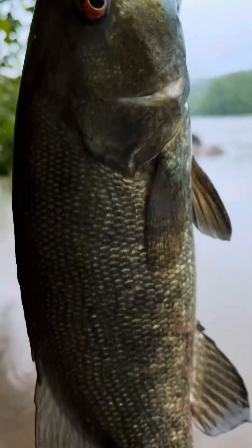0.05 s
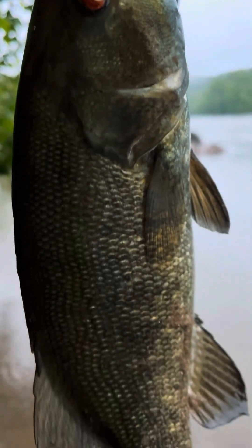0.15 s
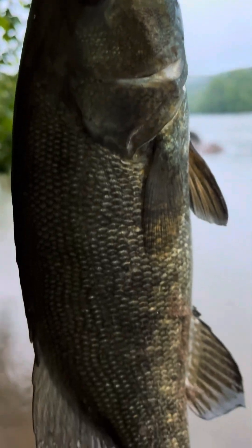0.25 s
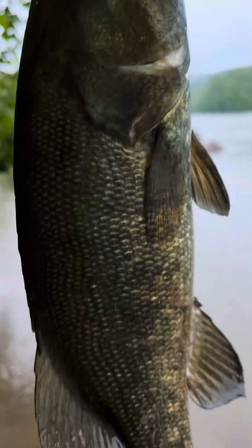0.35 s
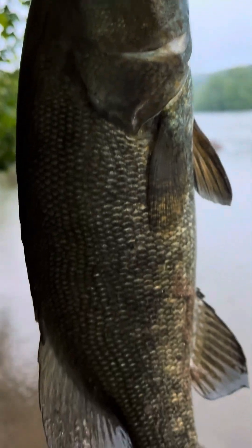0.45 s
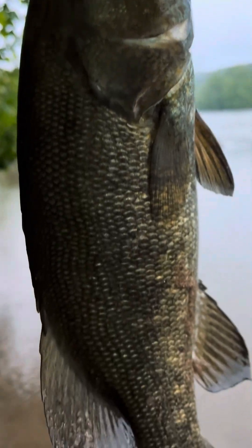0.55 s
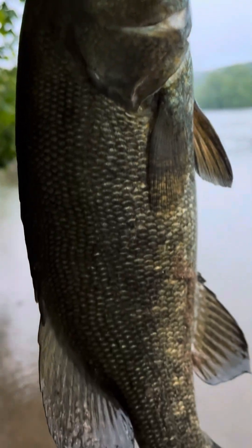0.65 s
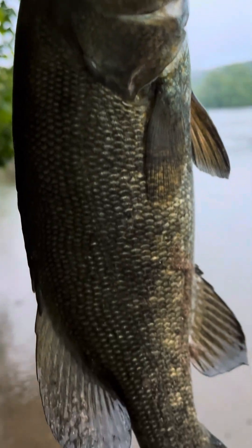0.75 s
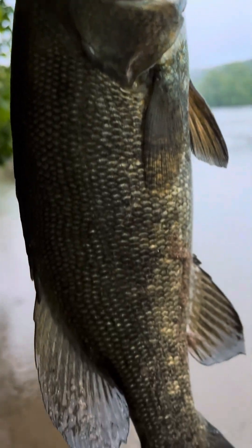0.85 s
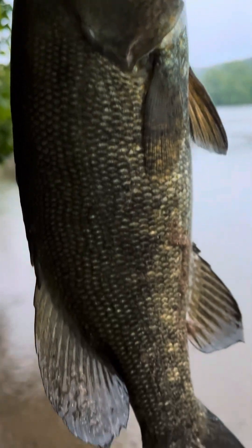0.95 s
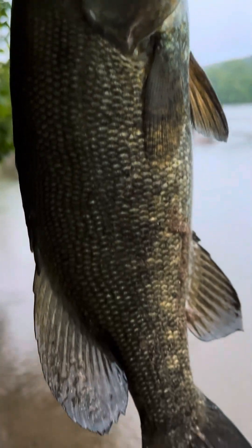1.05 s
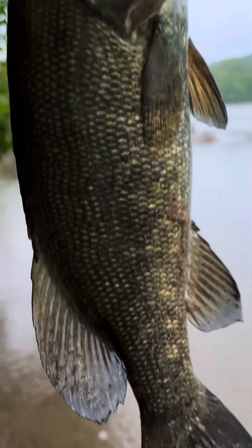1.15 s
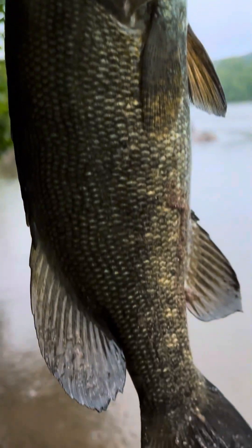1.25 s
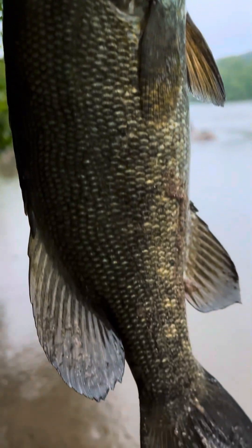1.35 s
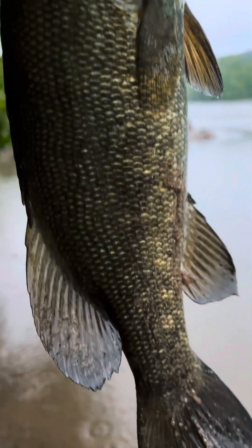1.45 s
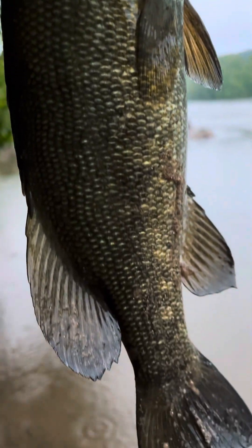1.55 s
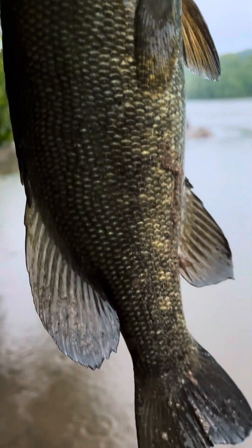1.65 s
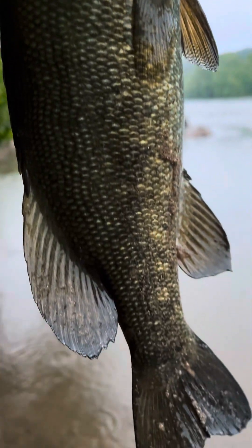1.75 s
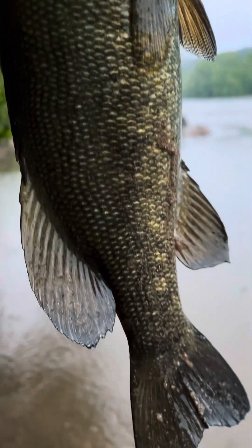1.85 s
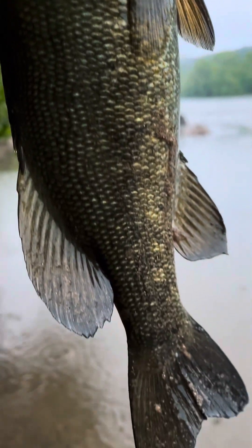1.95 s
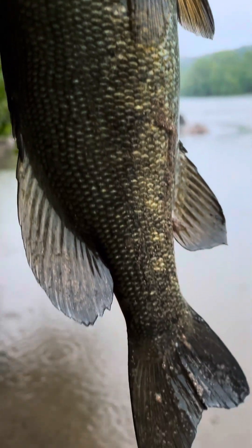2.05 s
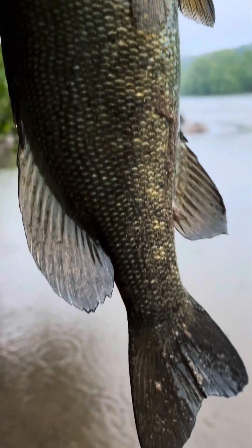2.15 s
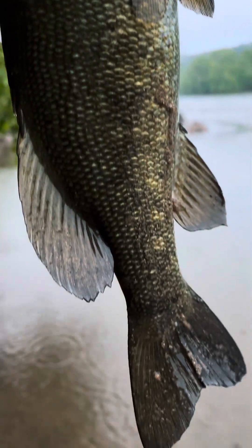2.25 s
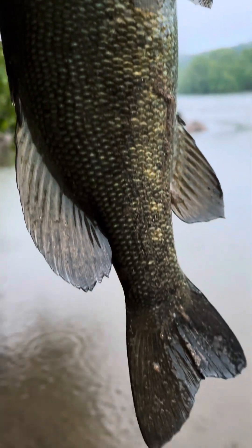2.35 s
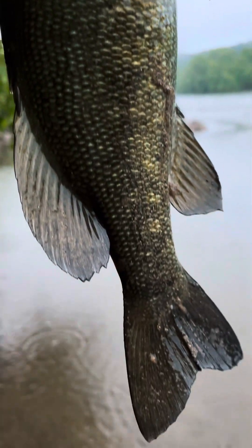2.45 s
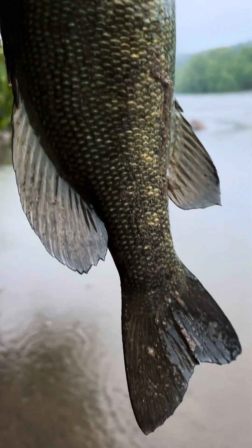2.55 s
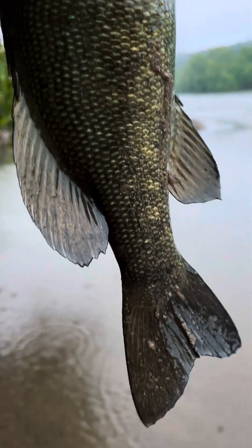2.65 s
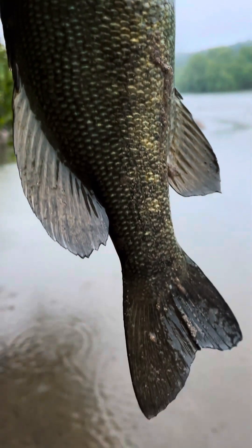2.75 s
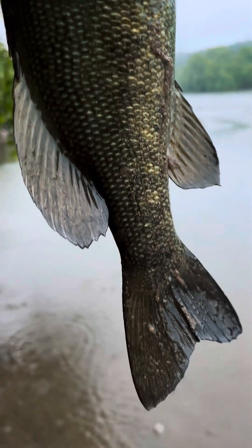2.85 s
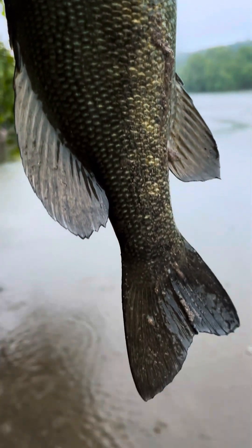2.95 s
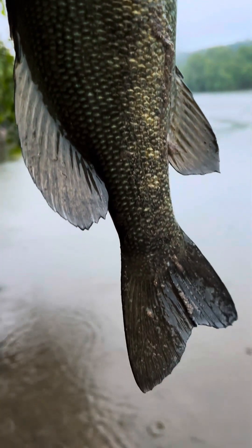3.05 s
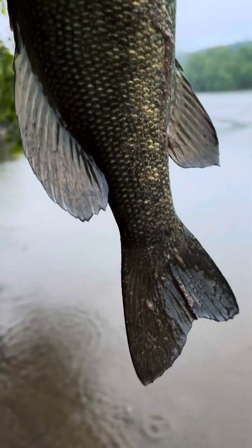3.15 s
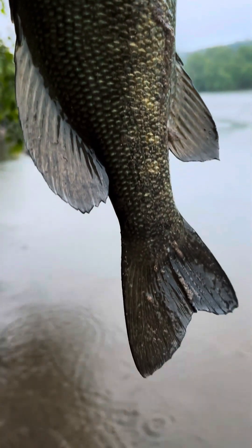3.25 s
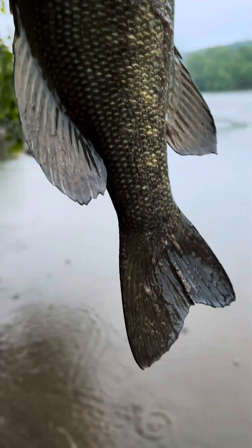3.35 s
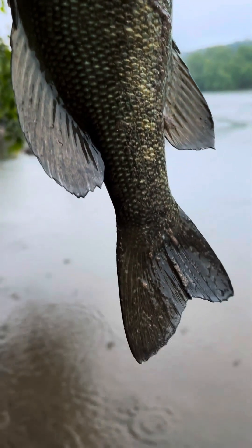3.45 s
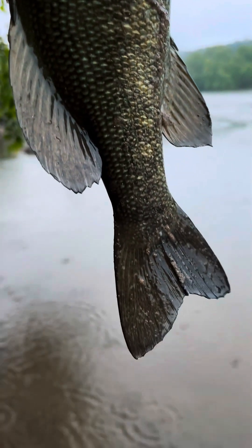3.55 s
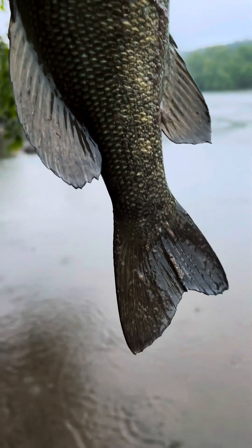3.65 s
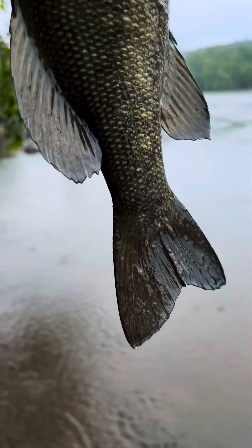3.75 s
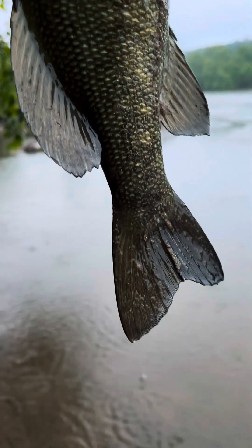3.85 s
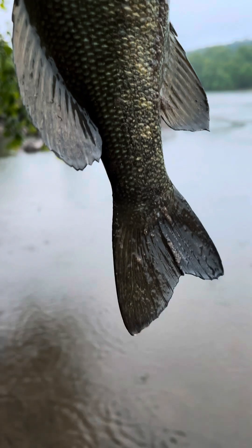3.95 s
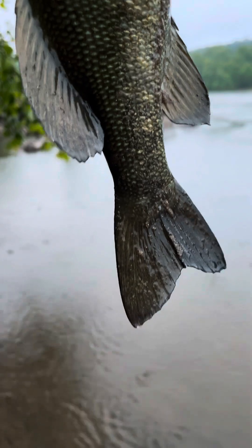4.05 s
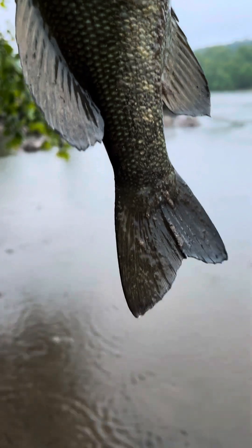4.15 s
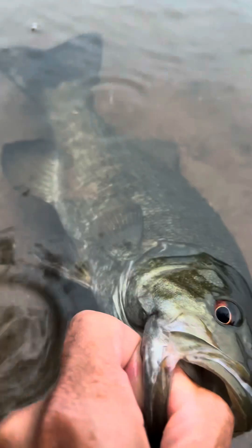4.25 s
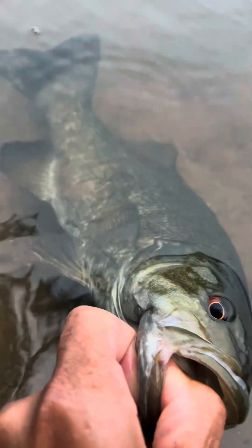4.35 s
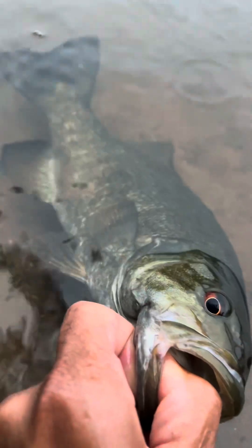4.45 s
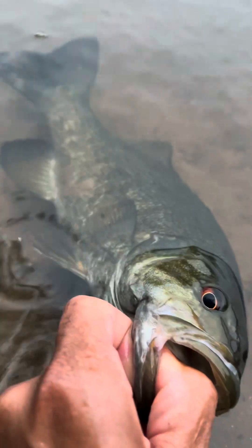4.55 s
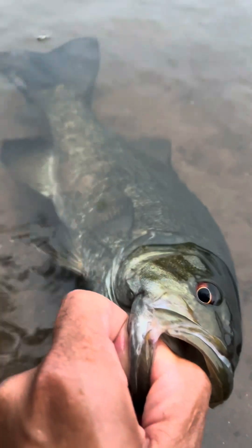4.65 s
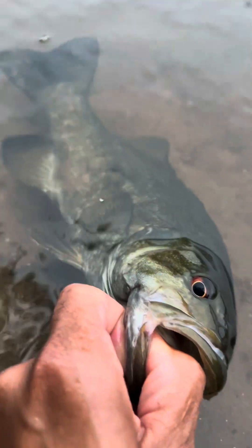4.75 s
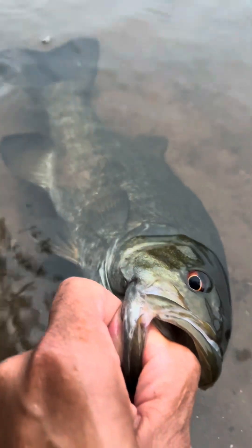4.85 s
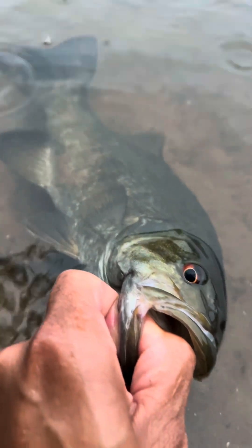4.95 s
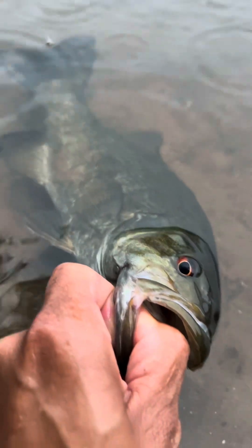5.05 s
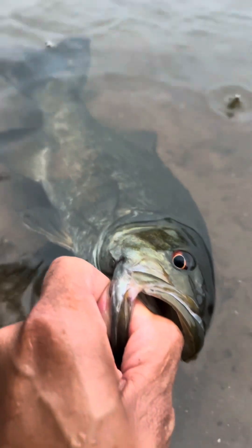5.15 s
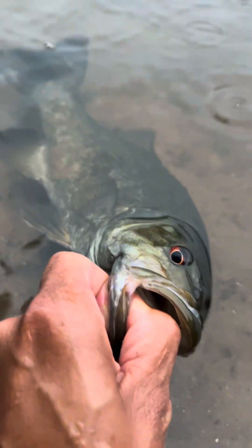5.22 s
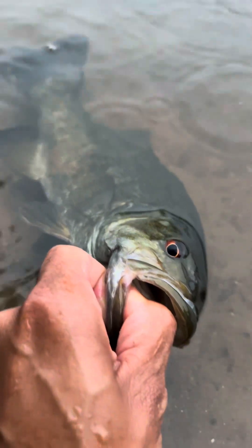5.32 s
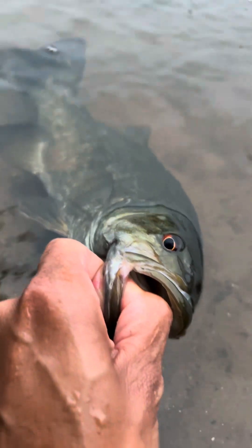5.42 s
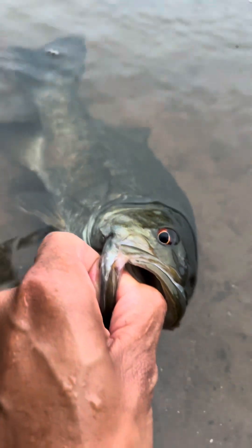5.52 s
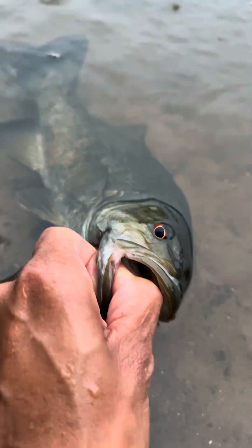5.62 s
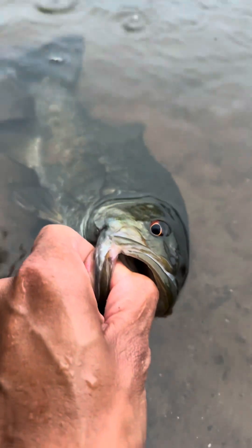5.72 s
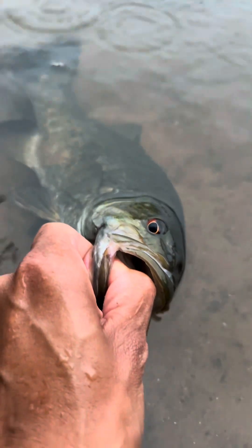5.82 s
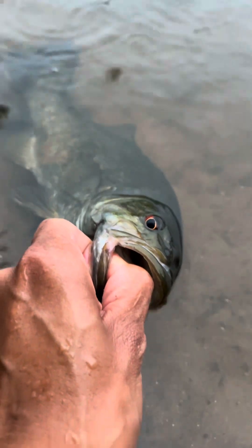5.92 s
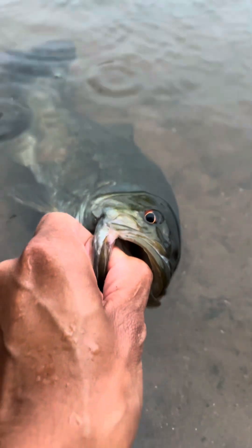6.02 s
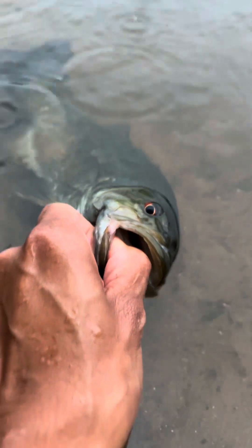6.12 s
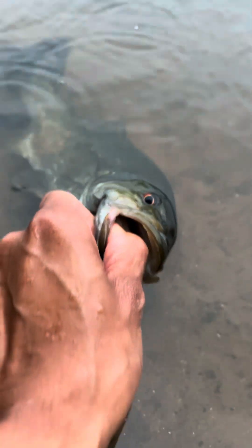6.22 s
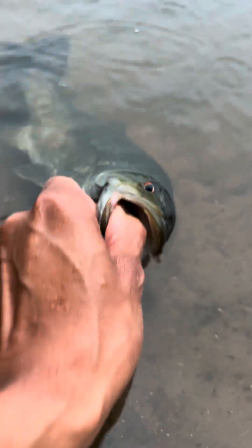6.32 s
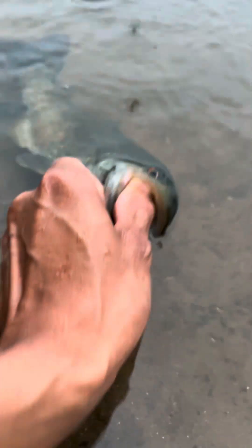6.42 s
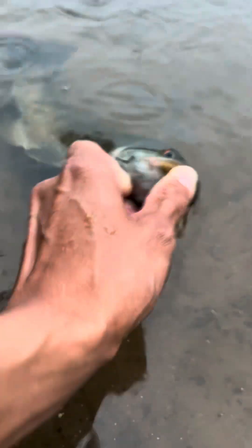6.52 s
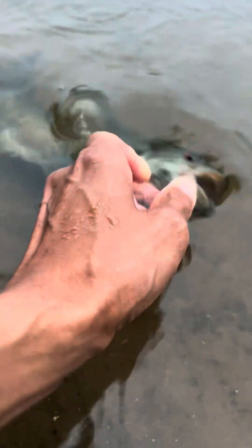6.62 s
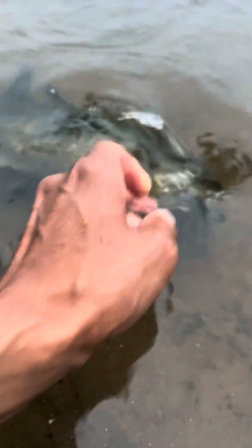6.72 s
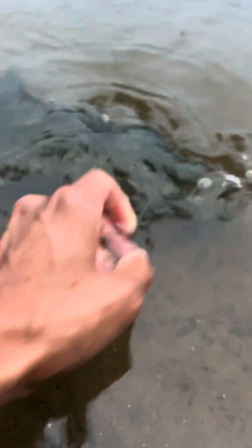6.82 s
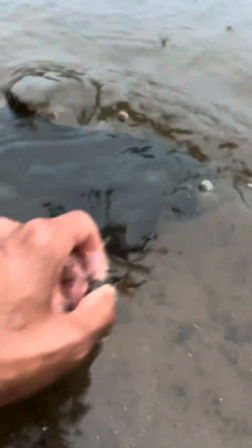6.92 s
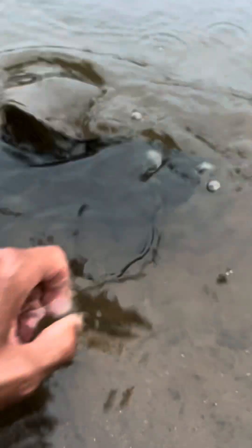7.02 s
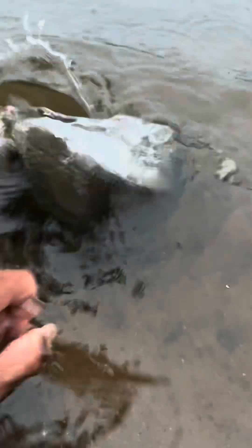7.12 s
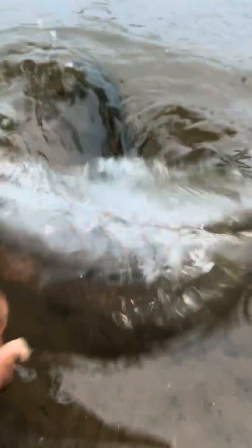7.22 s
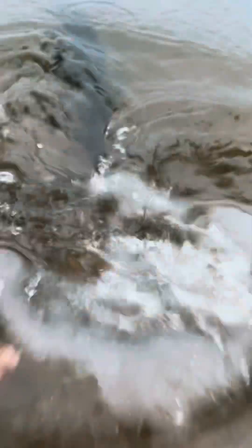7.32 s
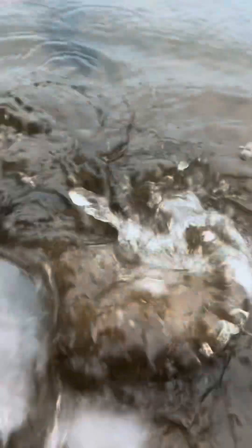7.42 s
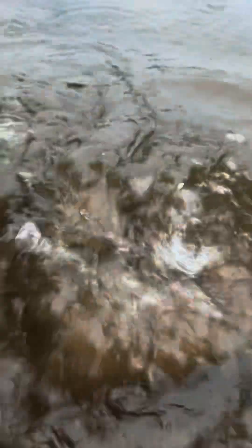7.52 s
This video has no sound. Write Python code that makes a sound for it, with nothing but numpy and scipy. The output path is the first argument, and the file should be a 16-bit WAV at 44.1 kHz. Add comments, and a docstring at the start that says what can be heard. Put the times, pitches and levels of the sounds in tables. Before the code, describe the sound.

Steady rain falls on a river outdoors, heard close up through a phone in stereo. From 0 to 4.2 seconds it is a full, broad hiss with fine patter and crackle over a dull, swaying rumble, growing very slightly. Crisp near ticks and drips stand out, notably around 0.4, 0.7, 1.4, 2.3, 2.7 and 3.75 seconds, some with a tiny ringing bubble. From about 3.25 seconds a distant bird gives faint, slurred, burry whistles with a soft echo. At 4.2 seconds the sound cuts abruptly to much quieter rain with little rumble and only sparse, small drips, one bubbly at 5.0. At 6.67 a soft hollow plop fades and bends upward. At 7.02 a sharp wet slap cracks, followed by surging spray, deep gulping bubbles around 7.15 to 7.25, and gurgling froth, with another burst near 7.4 before it subsides at the end.

```python
"""Steady rain on a river, heard by a phone: a hiss of far drops, near ticks and drips, a low rumble, then a far bird.
The level drops abruptly to a quieter stretch, where a fish slips free: a plop, a tail slap, a gurgling splash.
Rain and spray are shaped noise plus swarms of damped sines; ticks are band-passed pushes and puffs.
Bubbles, plop and whistles are gliding sines; the sides differ in phase, stepped in the treble."""
import sys
import numpy as np
from scipy import signal
from scipy.fft import rfft, irfft, next_fast_len
from scipy.io import wavfile
from scipy.ndimage import uniform_filter1d, map_coordinates

SR = 44100
rng = np.random.default_rng(int(sys.argv[2]) if len(sys.argv) > 2 else 0)


def store_wav(level_fs):
    """Save 16-bit WAV to argv[1]."""
    pcm = np.round(np.clip(np.atleast_2d(level_fs), -1, 1) * 32767)
    wavfile.write(sys.argv[1], SR, pcm.T.astype(np.int16))


N = 334278
TIME = np.arange(N) / SR
SIDES = np.array([[1], [-1]]) / 2  # left, right halves of a difference
QUIET_FROM_S = 4.189


def amp(db):
    """Decibels to linear gain."""
    return 10 ** (np.asarray(db) / 20)


def unit(x):
    """Scale to rms 1."""
    return x / np.sqrt(np.mean(x ** 2) + 1e-20)


def along(points, hz):
    """Interpolate (frequency [Hz], value) points on a log-frequency axis."""
    f, v = np.transpose(points)
    return np.interp(np.log(hz + 1), np.log(f + 1), v)


def wobble(knots_per_s):
    """Smooth random curve through normal knots."""
    knots = rng.standard_normal(int(N * knots_per_s / SR) + 4)
    return map_coordinates(knots, [TIME * knots_per_s])


def filtered(x, response):
    """Multiply the spectrum of x by a complex response of frequency."""
    m = next_fast_len(x.shape[-1] + 8192)
    spectrum = rfft(x, m) * response(np.fft.rfftfreq(m, 1 / SR))
    return irfft(spectrum, m)[..., :x.shape[-1]]


def rush(spectrum, alike, patchy_db):
    """Stereo noise of rms 1, patchy in time and frequency, with a left-right likeness set by frequency."""
    z = signal.stft(rng.standard_normal((2, N)), nperseg=256)[2]
    field = uniform_filter1d(rng.standard_normal(z.shape[1:]), 12, 0)
    field = uniform_filter1d(field, 5, 1)
    pair = signal.istft(z * amp(patchy_db * unit(field)), nperseg=256)[1][:, :N]

    def mid_side(hz):
        turn = np.arccos(np.clip(along(alike, hz), -1, 1)) / 2
        return amp(along(spectrum, hz)) * [np.cos(turn), np.sin(turn)]

    mid, side = filtered(pair, mid_side)
    return unit(np.array([mid + side, mid - side]))


SCATTER_S = .00004  # largest arrival difference between sides


def grains(count, centre_hz, octaves, cycles, spread_db, rise, span=(0, N / SR)):
    """Damped, gliding sines at random moments and sides, rms 1 over the span; a few are larger."""
    u, g = rng.random((count, 4)), rng.standard_normal((count, 1))
    hz = np.clip(centre_hz * 2 ** (octaves * g), 300, 14500)
    t = np.arange(min(int(6 * cycles * SR / centre_hz), 1400)) / SR
    turns = hz * t
    fade = (1 - np.exp(-2 * turns)) * np.exp(-turns / cycles) * np.cos(np.pi / 2 * t / t[-1])
    size = amp(-spread_db * np.log(u[:, 1:2] + 0.025))
    wave = size * fade * np.sin(2 * np.pi * turns * (1 + rise * turns / cycles))
    start = np.interp(u[:, :1], [0, 1], span) * SR
    lag = (2 * u[:, 3:] - 1) * SCATTER_S * SR
    at = [(np.abs(start + 8 + k * lag).astype(int) + np.arange(len(t))).ravel() for k in SIDES]
    gains = amp(3 * (u[:, 2:3] - .5)), amp(3 * (.5 - u[:, 2:3]))
    pair = np.array([np.bincount(a, (wave * s).ravel(), N + len(t))[:N] for a, s in zip(at, gains)])
    return unit(pair) * np.sqrt((span[1] - span[0]) * SR / N)


# rumble spectrum: (frequency [Hz], relative density [dB])
RUMBLE_SPECTRUM = [(13, -15), (22, -53), (50, -2.5), (97, 0.5), (175, -7.5), (258, -15), (400, -24.5),
                   (520, -29), (880, -120)]
# far-rain spectrum, loud stretch: (frequency [Hz], relative density [dB])
LOUD_HISS_SPECTRUM = [(120, -41), (300, -1), (600, -0.5), (1200, -1), (2300, -5.5), (3000, -5.5),
                      (4800, -8), (5700, -10), (6900, -15), (9000, -18), (12500, -19), (15700, -20.5),
                      (15950, -53)]
# far-rain spectrum, quiet stretch: (frequency [Hz], relative density [dB])
QUIET_HISS_SPECTRUM = [(120, -20), (300, 1), (600, -0.5), (1200, -2), (2300, -5.5), (3000, -7),
                       (4800, -8.5), (5900, -12), (6900, -17.5), (9500, -22), (12500, -17.5),
                       (15700, -20.5), (15950, -58)]
# far-rain stereo likeness: (frequency [Hz], left-right correlation [-1..1])
HISS_LIKENESS = [(60, .997), (200, .97), (400, .68), (800, .35), (1500, -.1), (2000, -.2), (2600, .4),
                 (3200, -.1), (3800, .15), (4400, 0), (5100, .5), (6200, .82), (8000, .97), (16000, .98)]
# rain balance, positive leans left: (frequency [Hz], left-right difference [dB])
RAIN_LEAN = [(100, -3), (300, 2), (700, 3), (1500, 2), (3000, 0.6), (5000, -1), (9000, 0)]
# base levels: (rumble [dB], rain [dB])
LOUD_DB, QUIET_DB = (-39, -42.5), (-56, -60.5)
LOUD_GROWTH_DB_PER_S, RUMBLE_SWAY_DB = 0.18, 1.87


def rain():
    """Far drops merge to hiss with crackle, patter and faint short tones scattered through it, over a dull rumble."""
    late = TIME >= QUIET_FROM_S
    rumble_db, rain_db = np.where(late, np.c_[[QUIET_DB]].T, np.c_[[LOUD_DB]].T)
    growth_db = LOUD_GROWTH_DB_PER_S * TIME * ~late
    rain_db = rain_db + growth_db
    rumble_db = rumble_db + growth_db + RUMBLE_SWAY_DB * wobble(3.07)

    quiet_hiss = rush(QUIET_HISS_SPECTRUM, HISS_LIKENESS, patchy_db=0.65)
    loud_hiss = rush(LOUD_HISS_SPECTRUM, HISS_LIKENESS, patchy_db=1.5)
    hiss = np.where(late, quiet_hiss, loud_hiss)

    crackle = grains(count=450, centre_hz=10000, octaves=.3, cycles=2.5, spread_db=3, rise=0)
    patter = grains(count=2000, centre_hz=4200, octaves=.5, cycles=6, spread_db=2.2, rise=0)
    short_tones = grains(count=2000, centre_hz=3300, octaves=.5, cycles=16, spread_db=2, rise=.012)
    texture = amp(np.where(late, -19.5, -23)) * crackle
    texture += amp(np.where(late, -16, -14) + 3 * wobble(6)) * patter
    texture += amp(-11.5) * short_tones

    shower = filtered(amp(rain_db) * (hiss + texture), lambda hz: amp(SIDES * along(RAIN_LEAN, hz)))
    rumble = rush(RUMBLE_SPECTRUM, [(60, .998), (150, .992), (250, .97), (400, .8)], patchy_db=.4)
    return shower + amp(rumble_db) * rumble


# near drops and tail slaps, positive pan is left:
# (time [s], peak before pan [dB], centre [Hz], width [octaves], pan [dB])
TICK_HITS = [(0.399, -32, 3300, 1, 0), (0.4077, -21.5, 3700, 1.04, -11), (0.416, -29, 4300, 1.2, 13),
             (0.423, -33, 4000, 0.97, 5), (0.437, -35, 4000, 1.3, 0), (0.446, -33, 3600, .8, 2),
             (0.527, -34, 3800, 0.74, 9), (0.659, -25, 3230, 1.5, 4), (0.932, -34, 1800, 0.63, -5),
             (1.088, -31.5, 920, 1.5, 14), (1.2805, -29, 3600, 1.4, 1), (1.379, -26.5, 3000, 1.4, 0),
             (1.4376, -22.5, 8450, 1.5, 8), (1.532, -31, 9600, 0.62, 0), (1.625, -34, 10000, 1, 0),
             (1.646, -34, 7500, 1.2, 0), (2.17, -34, 11500, 0.53, 0), (2.259, -24, 4240, 1.14, 2),
             (2.286, -35, 2100, 0.37, 0), (2.289, -28.5, 11500, .8, 0), (2.354, -36, 2700, 0.37, 3),
             (2.417, -33, 2350, 0.41, 0), (2.446, -32, 3000, 1.2, 6), (2.707, -29.5, 2760, 0.64, 3),
             (2.735, -26.5, 3300, 1.45, -1), (2.781, -28.5, 1700, 1.1, -1), (3.742, -25, 2750, 0.4, 2),
             (3.758, -31, 6000, 1.5, 0), (3.929, -30, 4020, 0.47, 1), (4.24, -50, 9000, 1.5, -7),
             (4.279, -46, 4100, 0.5, -2), (4.443, -45, 3900, .5, 1), (4.507, -48, 7500, 1, 0),
             (4.616, -51, 3700, .4, 2), (4.757, -43, 4800, 0.64, 5), (5.024, -48, 1300, 2.6, 5),
             (5.704, -50, 8000, 1.4, 0), (6.109, -52, 12000, .8, 0), (6.397, -44, 1210, 1, 0),
             (6.436, -45, 1850, 0.5, -1), (6.62, -52, 7450, 1, -2), (6.653, -45, 6000, 1.6, 2),
             (6.672, -38, 1690, 0.81, 0), (6.682, -37, 7500, 1.3, 7), (6.727, -39.5, 3200, 1.3, 0),
             (6.75, -38, 6000, 1.2, 1), (6.811, -46, 2500, 2.2, 5), (6.997, -33, 6000, 1.8, 0),
             (7.017, -25, 2500, 1.2, 2), (7.0194, -15, 4800, 0.82, 4.5), (7.022, -20, 4600, 1.1, -6),
             (7.024, -28, 2800, 0.73, 4), (7.021, -20, 1300, 1.7, 7), (7.033, -18, 4680, 0.68, -2),
             (7.098, -36, 3500, 2.2, -4), (7.162, -35, 2500, 0.56, 2), (7.178, -31, 3900, 0.65, -4),
             (7.215, -30, 2500, 2.3, -2), (7.2562, -20, 1510, 1.15, -4), (7.2877, -24, 3300, 1.3, -1),
             (7.293, -30, 3000, 1.2, 0), (7.332, -30, 2740, 0.58, 2), (7.384, -36, 8000, 1.7, -3),
             (7.412, -30, 2570, 2.1, 5), (7.496, -38, 6140, 1.2, 0), (7.542, -39, 6460, .66, -1)]
T60_AT_2KHZ_S, SHORTENING_POWER = 0.014, 0.38  # higher ticks die sooner


def ticks():
    """Each blow is a sudden push and a puff of noise round its own centre, dying in milliseconds."""
    out, t = np.zeros((2, N + SR)), np.arange(2048) / SR
    for s, db, hz, octaves, pan_db in TICK_HITS:
        t60 = T60_AT_2KHZ_S * (2000 / hz) ** SHORTENING_POWER
        band = lambda f: np.exp(-.5 * (np.log2((f + 1) / hz) / (abs(octaves) / 2)) ** 2)
        push = filtered(np.arange(len(t)) == 12, band)
        puff = unit(filtered(rng.standard_normal(len(t)), band))
        puff = puff * amp(-60 * t / t60) * (1 - np.exp(-t / .00015))
        burst = push / push.max() + puff
        out[:, round(s * SR):][:, :len(t)] += amp(db) * burst / abs(burst).max() * amp(SIDES * pan_db)
    return out[:, :N]


# ringing air pockets: (time [s], level before decay [dB], start pitch [Hz], glide [octaves], t60 [s])
AIR_POCKETS = [(0.4078, -23.5, 2150, -.1, 0.0076), (.527, -22.5, 1480, 0.0099, 0.011),
               (2.856, -39, 1860, .07, .046), (3.025, -32.5, 1910, 0.14, .03),
               (3.759, -25.5, 1520, -0.14, 0.04), (4.279, -52, 4250, -0.11, .015),
               (4.445, -55, 3680, -.1, 0.033), (4.474, -57, 3350, 0, .03), (4.617, -46, 3200, -0.14, 0.026),
               (5.023, -35, 820, -0.097, 0.014), (6.621, -51, 2940, -0.23, .033),
               (6.621, -49, 1100, 0.51, .055), (6.629, -36, 430, -0.11, 0.029),
               (6.706, -46, 1474, 0.19, .06), (6.756, -50, 2480, 0, .03), (6.77, -46, 1033, -0.49, 0.15),
               (6.81, -46, 2030, -0.046, 0.034), (6.983, -34.5, 1750, -.03, 0.018),
               (6.998, -33, 2290, 0.39, 0.023), (7.02, -26, 1140, -0.42, 0.02),
               (7.0335, -10, 2460, -0.23, 0.0071), (7.043, -36, 2340, -.2, .02),
               (7.047, -26.5, 1610, 0.42, 0.031), (7.066, -45, 2300, 0, .08), (7.069, -38, 1900, 0, .03),
               (7.099, -43, 2150, .1, .025), (7.094, -41, 1150, 0, .03), (7.157, -32, 2260, -0.3, 0.054),
               (7.16, -38, 2880, -0.13, .03), (7.272, -39, 4050, -.1, .04), (7.372, -40, 3050, -0.12, .03),
               (7.064, -33.5, 1280, 0.27, 0.059), (7.062, -33, 6960, -0.34, .025),
               (7.076, -42, 4500, 0.23, .025), (7.097, -37, 1490, 0.13, .038),
               (7.14, -26.5, 756, 0.22, 0.036), (7.148, -31, 1750, 0.05, 0.035),
               (7.149, -23, 398, 0.018, 0.052), (7.158, -13.5, 453, 0.15, 0.039),
               (7.166, -27, 509, 1.3, 0.1), (7.18, -31, 313, 0.57, 0.188), (7.213, -22, 413, 0.13, 0.054),
               (7.215, -32, 2060, 0.074, 0.097), (7.035, -41, 626, .2, 0.048),
               (7.055, -36, 517, -0.46, 0.043), (7.126, -40, 640, 0, .04), (7.35, -42, 644, 0.64, .12),
               (7.378, -39, 707, .2, .08), (7.41, -36, 897, 0.61, .08), (7.226, -9.5, 393, -0.084, 0.034),
               (7.235, -28.5, 1860, -0.12, 0.043), (7.257, -23, 759, .09, 0.084),
               (7.257, -26, 1300, 0.25, 0.046), (7.281, -26, 472, 0.61, 0.087),
               (7.287, -28.5, 2410, 0, 0.037), (7.262, -39, 3100, 0.18, 0.051),
               (7.25, -28, 2270, -0.016, 0.066), (7.31, -32.5, 4300, -0.05, 0.042),
               (7.385, -39, 4900, 0, .02), (7.397, -39, 4750, 0, .025), (7.247, -37, 4400, 0, .03),
               (7.222, -37, 4450, 0, .03), (7.331, -30.5, 1170, 0.16, 0.11), (7.336, -32, 1600, 0.27, .05),
               (7.412, -24, 650, -0.32, 0.038), (7.412, -20.5, 2360, 0.081, 0.011),
               (7.42, -36.5, 340, -0.0057, 0.16), (7.431, -33.5, 1590, -0.15, 0.054),
               (7.551, -35.5, 728, 0.33, 0.052)]
PITCH_WAVER = .025  # random share of pitch
BUBBLES_LEFT_DB = 2.5  # left-right difference


def bubbles():
    """A trapped pocket rings as one decaying tone that glides and wavers in pitch."""
    out, t = np.zeros(N + SR), np.arange(SR // 3) / SR
    for s, db, start_hz, octaves, t60 in AIR_POCKETS:
        hz = start_hz * 2 ** (octaves * np.minimum(t / (t60 / 2), 1))
        hz = hz * (1 + PITCH_WAVER * np.interp(t * 150, np.arange(60), rng.standard_normal(60)))
        rise_s = .005 * (400 / start_hz) ** 2  # large pockets start softly
        swell = 1 - np.exp(-(t / rise_s) ** 2)
        tone = np.sin(2 * np.pi * np.cumsum(hz) / SR)
        out[round(s * SR):][:len(t)] += amp(db - 60 * t / t60) * swell * tone
    return out[:N]


# slurred whistles: (start [s], end [s], start pitch [Hz], end pitch [Hz], level before trim and burr [dB])
WHISTLES = [(3.25, 3.29, 3720, 3620, -56), (3.32, 3.375, 2420, 2690, -47), (3.42, 3.51, 2680, 3250, -49),
            (3.35, 3.38, 3750, 3600, -55), (3.52, 3.575, 3120, 3150, -54), (3.56, 3.61, 3100, 2800, -55),
            (3.62, 3.7, 3660, 3580, -56), (3.47, 3.51, 2700, 2900, -55), (3.64, 3.67, 3800, 4100, -52),
            (3.70, 3.75, 2430, 2700, -50), (3.80, 3.89, 2720, 3250, -49), (3.935, 3.98, 3000, 2740, -49),
            (3.87, 3.92, 2880, 2850, -55), (3.96, 4.0, 3750, 3650, -55), (4.0, 4.045, 3450, 4150, -53),
            (4.05, 4.08, 4050, 4200, -54), (4.075, 4.125, 2380, 2660, -46.5), (4.11, 4.13, 2600, 2250, -52),
            (4.115, 4.215, 2580, 2850, -46)]


def bird():
    """Burry whistles across the water, blurred by echoes off the trees: decaying noise convolution."""
    song = np.zeros(N)
    burr, waver = wobble(55), wobble(90)
    for start, end, start_hz, end_hz, db in WHISTLES:
        u = np.clip((TIME - start) / (end - start), 0, 1)
        hz = (start_hz + (end_hz - start_hz) * u) * (1 + .012 * waver)
        level = np.sqrt(2) * amp(db - 1.5 + 3.5 * burr)
        song += level * np.sin(np.pi * u) ** .4 * np.sin(2 * np.pi * np.cumsum(hz) / SR)
    t = np.arange(SR // 2) / SR
    trees = rng.standard_normal((2, len(t))) * amp(-60 * t / .4)
    echo = signal.fftconvolve(song[None], trees / np.linalg.norm(trees[0]), axes=1)[:, :N]
    return (song + amp(-1.5) * echo) * (TIME < QUIET_FROM_S)


# pocket left by the fish's mouth, before waver: (time [s], pitch [Hz], rms level [dB])
PLOP_PATH = [(6.6728, 970, -30), (6.689, 1013, -34.5), (6.702, 1190, -37.5), (6.710, 1090, -49),
             (6.717, 1200, -51), (6.724, 1500, -46), (6.734, 2250, -62)]


def plop():
    """A pocket near 1 kHz starts at once, fades as it splits and bends up in pitch as it bursts."""
    s, hz, db = np.transpose(PLOP_PATH)
    u = np.clip((TIME - s[0]) / (s[-1] - s[0]), 0, 1)
    pitch_hz = np.interp(TIME, s, hz) * (1 + .04 * u ** 2 * wobble(150))  # wavers as it breaks up
    gate = np.clip(u / .0064, 0, 1) * (u < 1)
    level_db = np.interp(TIME, s, db) + 3 * u ** 2 * wobble(250)
    return np.sqrt(2) * amp(level_db) * gate * np.sin(2 * np.pi * np.cumsum(pitch_hz * (u > 0)) / SR)


# spray spectrum: (frequency [Hz], relative density [dB])
SPRAY_SPECTRUM = [(300, -23), (1000, 1.5), (2500, 2), (5200, -1.5), (7000, -3.5), (10000, -9.5),
                  (13000, -9), (15700, -16), (15950, -60)]
# churned water as the fish thrashes: (peak time [s], spray [dB], bubbling [dB], fall [dB/s])
CHURN_SURGES = [(6.68, -60.5, -72, 78), (7.027, -36, -42, 505), (7.045, -54.5, -48, 170),
                (7.075, -51, -61, 152), (7.1, -59, -60, 150), (7.135, -49.5, -52, 150),
                (7.168, -45.5, -40, 157), (7.22, -40.5, -57, 150), (7.27, -37.5, -41, 160),
                (7.385, -43.5, -40.5, 211), (7.419, -46, -41, 600), (7.57, -59, -52, 94)]
RISE_TO_FALL_RATE = 1.9
CHURN_FROM_S = 6.6


def splash():
    """Thrown water: patchy spray, froth and glints over a swarm of bubbles of rising pitch."""
    s, spray_db, bubbling_db, fall = np.transpose(CHURN_SURGES)[:, :, None]
    below_db = fall * np.where(TIME > s, TIME - s, RISE_TO_FALL_RATE * (s - TIME))
    spray_gain = np.linalg.norm(amp(spray_db - below_db), axis=0)  # surges add in power
    bubbling_gain = np.linalg.norm(amp(bubbling_db - below_db), axis=0)
    span = (CHURN_FROM_S, N / SR)
    spray = rush(SPRAY_SPECTRUM, [(300, 0.42), (3000, 0.46), (8000, 1.0)], patchy_db=4.5)
    swarm = grains(count=3500, centre_hz=953, octaves=0.867, cycles=11, spread_db=2.6, rise=0.081, span=span)
    froth = grains(count=3000, centre_hz=2300, octaves=0.7, cycles=20, spread_db=3.5, rise=0.006, span=span)
    glints = grains(count=900, centre_hz=6000, octaves=0.39, cycles=15, spread_db=7.0, rise=0.0085, span=span)
    thrown = amp(-1.0) * spray + amp(-4.5) * froth + amp(-20) * glints
    return (TIME > CHURN_FROM_S) * (spray_gain * thrown + bubbling_gain * swarm)


def scene():
    """Sum the sources; the bubbles sit a little left."""
    placed_bubbles = amp(SIDES * BUBBLES_LEFT_DB) * bubbles()
    return rain() + ticks() + placed_bubbles + bird() + plop() + splash()


# left-right phase difference, stepped in the treble: (frequency [Hz], left phase lead [rad])
LEFT_LEAD = [(0, 0), (200, -.1), (600, -.35), (1100, -.2), (1700, .3), (2500, 1.9), (3700, .9), (4400, 1.1),
             (5100, 2.4), (5900, np.pi), (6500, 3.5), (7200, 4.9), (8000, 6), (9800, 6.6), (11800, 9.1),
             (13300, 9.7), (14600, 12.2), (17000, 13)]
BAND_LIMIT_HZ = 16855


def record(dry):
    """Sides differ in phase by frequency; top treble is shelved down; nothing passes the band limit."""
    phase = lambda hz: np.exp(1j * SIDES * np.interp(hz, *np.transpose(LEFT_LEAD)))
    shelf = lambda hz: amp(np.interp(hz, [15850, 16000], [0, -18]))
    return filtered(dry, lambda hz: phase(hz) * shelf(hz) * (hz < BAND_LIMIT_HZ))


dry = scene()
out = record(dry)
store_wav(out)
```